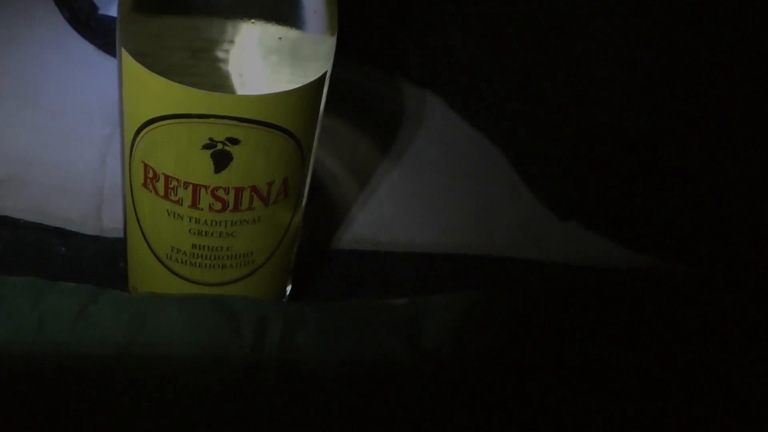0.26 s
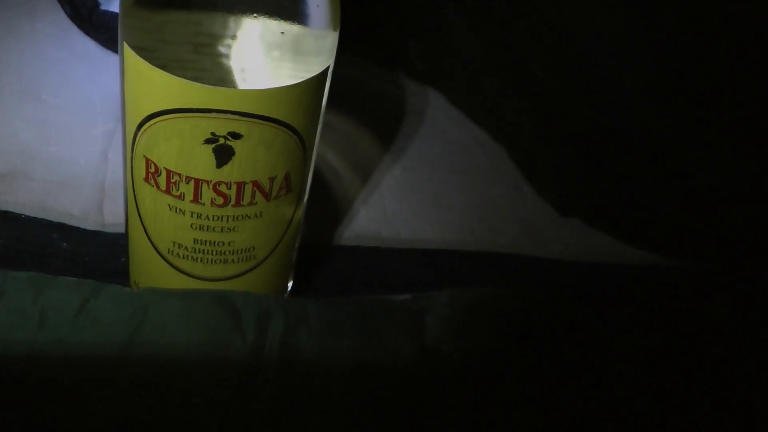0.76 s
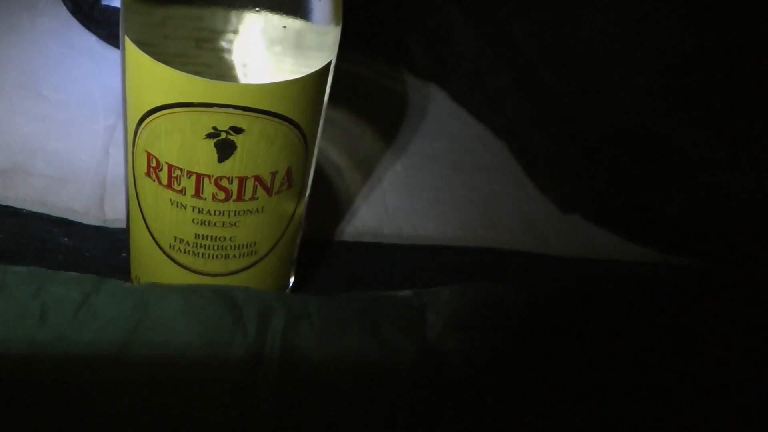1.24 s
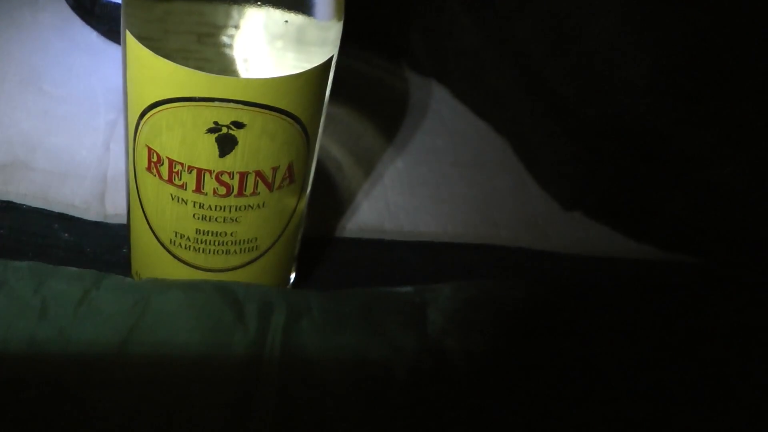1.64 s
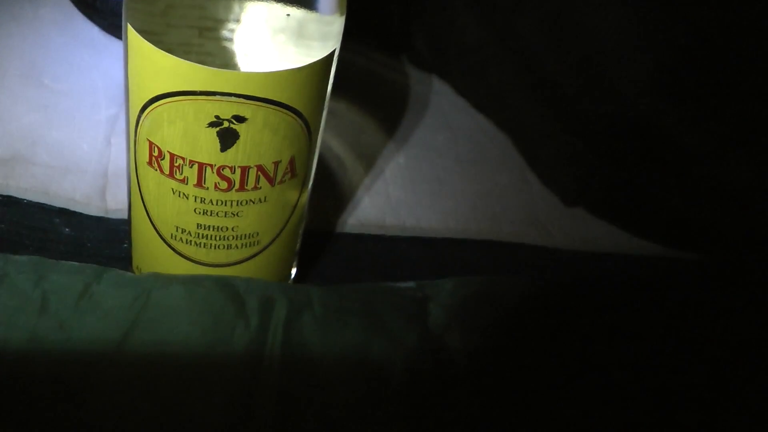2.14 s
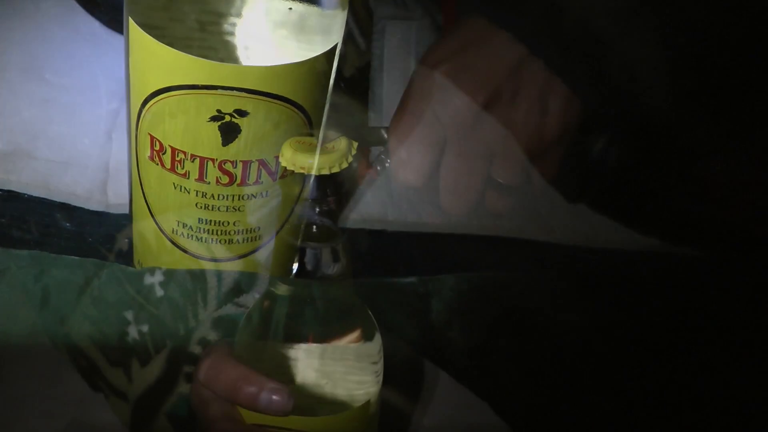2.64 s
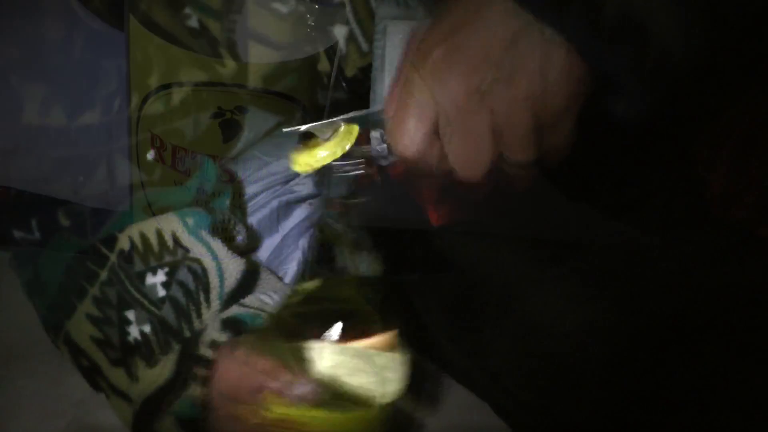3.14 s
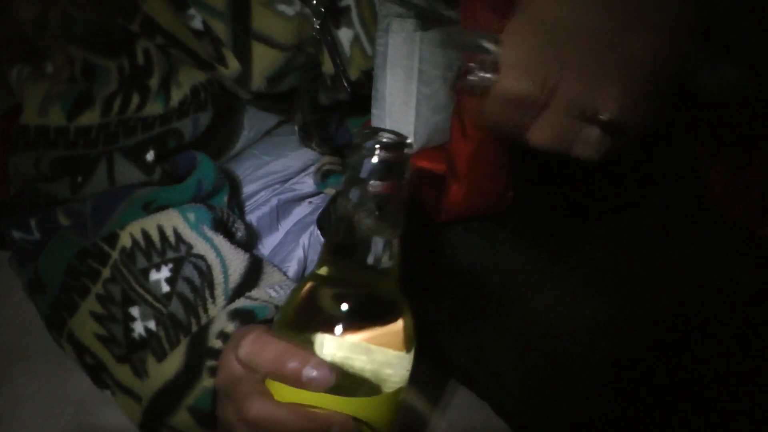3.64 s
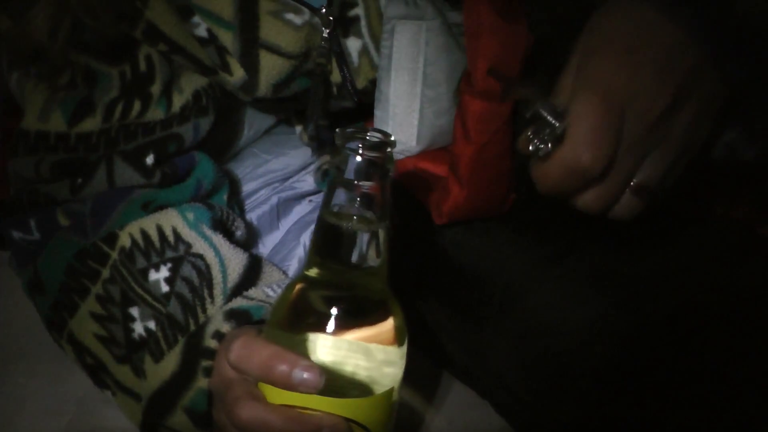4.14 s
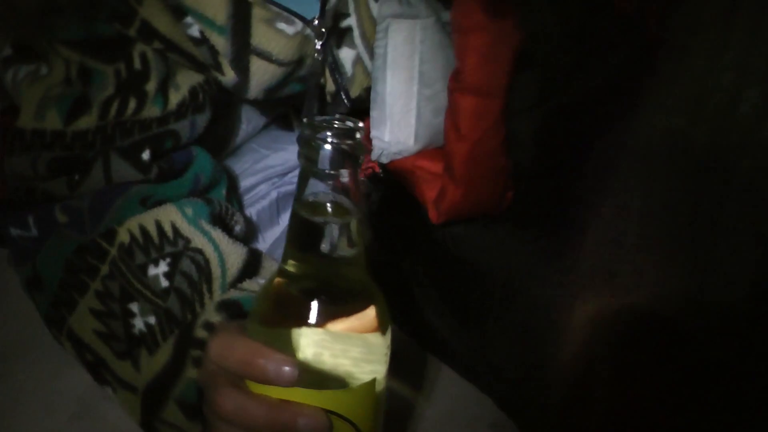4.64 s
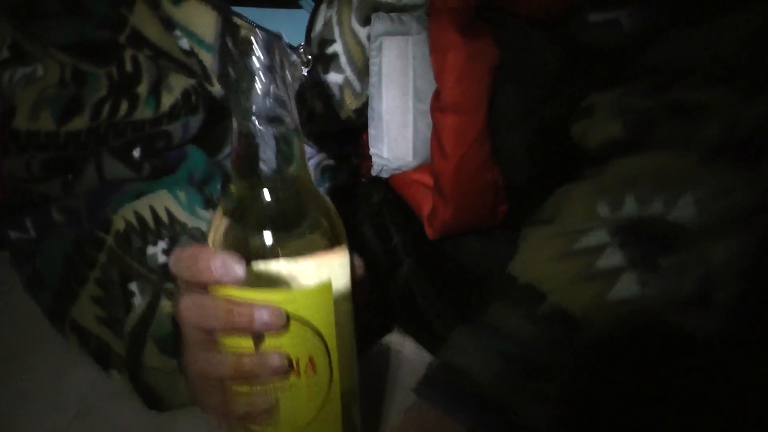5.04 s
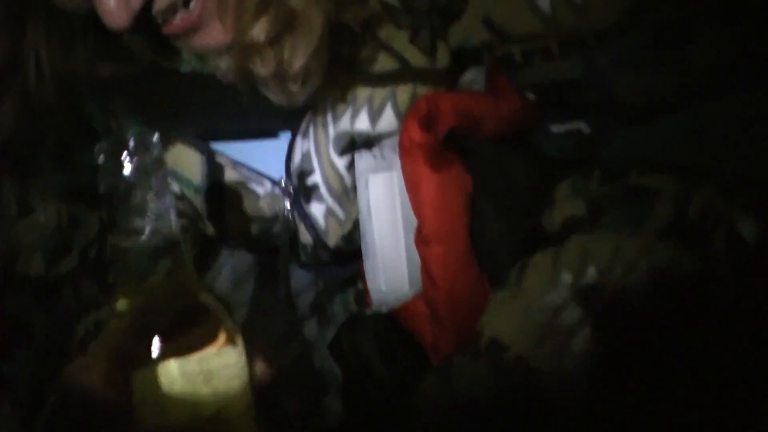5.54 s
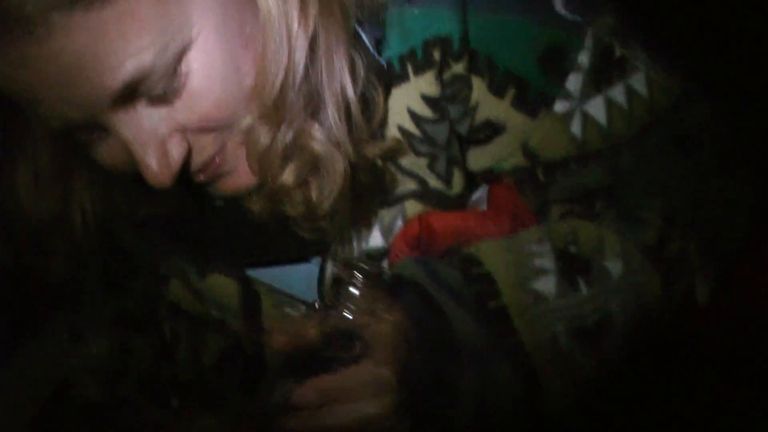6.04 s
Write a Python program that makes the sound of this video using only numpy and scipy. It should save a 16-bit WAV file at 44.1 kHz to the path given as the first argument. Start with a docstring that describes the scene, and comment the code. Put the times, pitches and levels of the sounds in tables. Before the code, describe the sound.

A night chorus of croaking frogs, with the pop and clink of a bottle being opened, then fabric rustles and handling knocks.

```python
"""Frogs call across the water at night: three croak in quick throat pulses that ring their vocal sacs,
a fourth pips, and more croak far off. Close by, someone levers the cap off a bottle: gas pops in the
neck, the steel opener rings and the cap clinks away. Then sleeves and a sleeping bag rustle, with
small knocks, as the bottle is moved."""
import sys
import numpy as np
from scipy import signal
from scipy.fft import rfft, irfft
from scipy.io import wavfile

SR = 44100
rng = np.random.default_rng(int(sys.argv[2]) if len(sys.argv) > 2 else 0)


def log_audio(samples):
    """Write samples as a 16-bit WAV file to the path given in sys.argv[1]."""
    # one column per channel
    frames = np.atleast_2d(samples).T
    # limit to full scale, then quantise
    limited = np.clip(frames, -1, 1)
    pcm = np.round(limited * 32767).astype(np.int16)
    wavfile.write(sys.argv[1], SR, pcm)


N = 276843
T = np.arange(N) / SR

# The near croaks and pips fade in together and grow louder: time_s, level_db
CALL_LEVEL = [(0, -63), (1, -55.5), (1.9, -51.5), (3, -50), (3.9, -47.5), (5.2, -45), (6.28, -48)]


def undb(db):
    """Turn decibels into a gain."""
    return 10 ** (np.asarray(db) / 20)


def unit(x):
    """Scale a sound to an average (rms) level of 1."""
    return x / np.sqrt(np.mean(x ** 2) + 1e-20)


def die_away(t, fade_s):
    """A fade that falls 60 dB in fade_s seconds."""
    return np.exp(-np.log(1000) * t / fade_s)


def curves(rows):
    """Turn each column after the times into a line through the whole scene."""
    times, *columns = np.transpose(rows)
    return [np.interp(T, times, column) for column in columns]


def add(out, start_s, x):
    """Mix a sound in at start_s."""
    i = int(round(start_s * SR))
    x = x[max(-i, 0):max(N - i, 0)]
    out[max(i, 0):max(i, 0) + len(x)] += x


def colour(x, spectrum):
    """Shape a sound's tone by (pitch_hz, level_db) points."""
    hz, db = np.transpose(spectrum)
    f = np.arange(N // 2 + 1) * SR / N + 1
    gain = undb(np.interp(np.log(f), np.log(hz), db))
    return unit(irfft(rfft(x) * gain, N))


def band(hz, width_hz, size):
    """Noise in one steep-sided band, with little bass."""
    f = np.arange(size // 2 + 1) * SR / size
    bass_cut = f ** 2 / (f ** 2 + (hz / 2) ** 2)
    gain = bass_cut / np.sqrt(1 + (2 * (f - hz) / width_hz) ** 4)
    return unit(irfft(rfft(rng.standard_normal(size)) * gain, size))


def wander(rate_hz):
    """A random line that drifts about 1 either side of zero."""
    points = rng.standard_normal(4096)
    return unit(np.interp(T * rate_hz, np.arange(len(points)), points))


def outdoors(x, echo_db, fade_s):
    """Reeds and banks scatter a short echo behind the sound."""
    t = T[:SR // 2]
    tail = rng.standard_normal(len(t)) * die_away(t, fade_s) * (t > .003)
    return x + undb(echo_db) * signal.fftconvolve(x, tail / np.linalg.norm(tail))[:N]


def bursts(bands, hits, rise_s):
    """Each hit is a sudden noise in the given bands that dies quickly."""
    out, t = np.zeros(N), T[:SR // 8]
    attack = 1 - np.exp(-t / rise_s)
    for start_s, db, fade_s in hits:
        noise = sum(undb(band_db) * band(hz, width, len(t)) for hz, width, band_db in bands)
        add(out, start_s, undb(db) * noise * attack * die_away(t, fade_s))
    return out


def ringing(tones, onsets):
    """At each onset the tones build up over rise_s, then ring away."""
    out, t = np.zeros(N), T[:SR // 3]
    ring = sum(undb(db) * np.sin(2 * np.pi * hz * t) * die_away(t, fade_s) for hz, db, fade_s in tones)
    for start_s, db, rise_s in onsets:
        add(out, start_s, undb(db) * ring * np.minimum(t / rise_s, 1))
    return out


def croak(length_s, sacs, pulses, speedup, glide, swell, rasp_db):
    """Throat pulses speed up, swell and fade; the tightening vocal sacs ring higher as they go."""
    progress = np.linspace(0, 1, pulses)
    starts = length_s * (progress + speedup * progress * (1 - progress))
    starts += .0001 * rng.standard_normal(pulses)
    arch = np.sin(np.pi * (np.arange(1, pulses + 1) / (pulses + 1)) ** swell)  # more swell peaks later
    sizes = arch * undb(rng.standard_normal(pulses))
    tension = (1 + glide * (progress - .6) + .009 * rng.standard_normal(pulses))[:, None]
    age = T[:SR // 40]
    rings = 0
    for hz, width, db in sacs:
        fade = 2 * np.pi * width * age
        envelope = width * fade ** 2 * np.exp(-fade)  # builds up and dies smoothly
        rings = rings + undb(db) * envelope * np.sin(2 * np.pi * hz * tension * age)
    voice, airflow = np.zeros((2, SR // 8))
    for start_s, size, ring in zip(starts, sizes, rings):
        add(voice, start_s, size * ring)
        add(airflow, start_s, size * np.exp(-age / .003))
    rasp = unit(airflow * band(2700, 4100, len(airflow)))  # air scrapes through with every pulse
    return (unit(voice) + undb(rasp_db) * rasp) * np.sqrt(length_s * SR / len(voice))


def frog(runs, sacs, length_s, gain_db, drift_per_s, **shape):
    """One frog croaks in evenly spaced runs while its pitch slowly drifts."""
    out = np.zeros(N)
    for first_s, period_s, croaks, run_db in runs:
        for start_s in first_s + period_s * np.arange(round(croaks)):
            call_db = np.interp(start_s, *np.transpose(CALL_LEVEL))
            db = call_db + gain_db + run_db + .8 * rng.standard_normal()
            tuning = 1 + drift_per_s * (start_s - 2)
            tuned_sacs = [(hz * tuning, width, sac_db) for hz, width, sac_db in sacs]
            add(out, start_s, undb(db) * croak(length_s, tuned_sacs, **shape))
    return out


def near_frogs():
    """The nearest frog, its neighbour and a raspy third each have their own throat and rhythm."""
    # Runs of croaks: start_s, period_s, croak_count, boost_db
    lead_runs = [(-.018, .202, 2, 0), (.427, .2157, 9, .3), (2.323, .197, 2, .5), (2.733, .2142, 3, 0),
                 (3.392, .2125, 9, 1), (5.27, .146, 2, 1), (5.615, .223, 3, .5)]
    neighbour_runs = [(.097, .224, 4, 0), (.986, .2128, 7, 0)]
    raspy_runs = [(.076, .1684, 9, 0), (1.614, .186, 2, .5), (1.996, .213, 7, .5), (3.487, .213, 8, -1.5),
                  (5.145, .18, 2, 6), (5.505, .207, 4, 0)]
    # Where throat and vocal sacs ring: pitch_hz, width_hz, level_db
    lead_sacs = [(826, 72, -5.5), (1030, 108, -7), (1196, 82, -10), (2049, 177, 1.9), (2940, 450, -20)]
    neighbour_sacs = [(876, 50, -15.5), (1060, 67, -14), (2045, 180, -5), (2900, 330, -21.5)]
    raspy_sacs = [(927, 99, -4.5), (1130, 103, -4), (2074, 276, -2), (2387, 143, 2.5), (3340, 300, -12)]
    lead = frog(lead_runs, lead_sacs, length_s=.063, gain_db=.75, drift_per_s=.0056,
                pulses=9, speedup=.12, glide=.0637, swell=.93, rasp_db=-22.5)
    neighbour = frog(neighbour_runs, neighbour_sacs, length_s=.052, gain_db=1.5, drift_per_s=.0043,
                     pulses=8, speedup=.22, glide=.08, swell=1.56, rasp_db=-22.5)
    raspy = frog(raspy_runs, raspy_sacs, length_s=.06, gain_db=-.97, drift_per_s=-.0079,
                 pulses=9, speedup=.33, glide=.093, swell=1.16, rasp_db=-13)
    return lead + neighbour + raspy


def pipping_frog(gain_db, base_hz, arch, sharpness):
    """A fast trill of short arched whistles that tilt down at first and later up."""
    # The frog slowly tires, then steadies: time_s, pips_per_s
    pip_rate = [(0, 27.9), (2.4, 24.85), (2.85, 22.2), (3.4, 24.8), (6.28, 24.2)]
    phase = np.cumsum(curves(pip_rate)[0]) / SR % 1 - .5  # zero in the middle of each pip
    tilt = np.interp(T, [2.5, 3.5], [-.11, .27])
    sag = .027 * np.clip(T - 2.5, 0, 1)
    pitch_hz = base_hz * (1 + tilt * phase - arch * phase ** 2 + .0221 * wander(40) - sag)
    envelope = np.abs(np.cos(np.pi * phase)) ** sharpness
    pips = unit(envelope * np.sin(2 * np.pi * np.cumsum(pitch_hz) / SR))
    return pips * undb(curves(CALL_LEVEL)[0] + gain_db + 1.2 * wander(8.4))


def far_frogs(count):
    """Distant frogs, each with its own pitch and tempo, blur into their echoes."""
    # Their loudness together: time_s, level_db
    loudness = [(0, -72), (.5, -66.5), (1.2, -64), (2.4, -63.5), (3, -55), (4, -55.5), (5, -53.5),
                (6.28, -54.5)]
    # Where a typical frog's sacs ring: pitch_hz, width_hz, level_db
    typical_sacs = [(791.1, 30, 0), (1106, 107, -7), (2230, 283, -1), (2750, 460, -7.5)]
    # The shape of each croak: speedup, glide, swell, rasp_db
    shape = (.12, .06, 1.2, -20)
    out = np.zeros(N)
    for tuning, period_s, first_s in rng.uniform([.94, .16, -.2], [1.06, .26, 0], (count, 3)):
        sacs = [(hz * tuning, width, db) for hz, width, db in typical_sacs]
        for beat_s in np.arange(first_s, T[-1], period_s):
            add(out, beat_s + .008 * rng.standard_normal(), croak(.062 / tuning, sacs, 8, *shape))
    return unit(outdoors(out, echo_db=0, fade_s=.41)) * undb(curves(loudness)[0])


def night_air():
    """Still air gives a faint wavering hush, plus a steady one that spreads it between the ears."""
    # Tone of the hush: pitch_hz, level_db
    tone = [(25, -34), (60, 2.5), (130, 4.5), (330, 0.5), (520, -6.5), (1500, 1.5), (4000, -5),
            (7000, -12.5), (8500, -20), (14500, -21), (16500, -37.5)]
    # Its loudness: time_s, level_db
    loudness = [(0, -73), (.3, -69), (1, -68.5), (1.5, -68), (2.1, -65), (2.6, -69), (6.28, -74)]
    hush = colour(rng.standard_normal(N), tone) * undb(curves(loudness)[0] + .71 * wander(6))
    spread = undb(-74.5) * colour(rng.standard_normal(N), tone)
    return hush, spread


def opening_ring():
    """A faint, high tone rings briefly at the very start."""
    # The ring: pitch_hz, level_db, fade_s
    tones = [(4010, -2.5, 0.15)]
    # Its onset: start_s, level_db, rise_s
    onsets = [(.003, -56, 0.0017)]
    return ringing(tones, onsets)


def brushes(grain_db):
    """Cloth and skin brush past in short, grainy strokes that swell and fade."""
    # Strokes: start_s, length_s, level_db, pitch_hz, width_hz
    strokes = [(0.248, 0.09, -66.5, 529, 160), (3.55, 0.037, -56, 303, 296), (3.74, 0.016, -34, 760, 700),
               (3.742, .13, -42, 5450, 3000), (3.764, 0.066, -53.5, 188, 199), (3.784, .12, -45, 807, 167),
               (3.985, 0.07, -45.5, 2480, 1170), (4.615, 0.52, -55, 450, 70),
               (4.873, 0.12, -42.5, 1160, 2000), (4.969, 0.15, -41, 808.6, 1310),
               (5.269, .24, -52, 300, 450), (5.072, 0.057, -33.5, 1380, 2440),
               (5.836, 0.157, -48, 4960, 900)]
    out, t = np.zeros(N), T[:SR // 2]
    for start_s, length_s, db, hz, width in strokes:
        swell = np.sin(np.pi * np.minimum(t / length_s, 1))
        add(out, start_s, undb(db) * band(hz, width, len(t)) * swell)
    return out * undb(grain_db * wander(400))


def creases():
    """Creases in the cloth snap with bright ticks."""
    # Tone of a snap: pitch_hz, width_hz, level_db
    bands = [(7000, 8500, 0)]
    # Snaps: start_s, level_db, fade_s
    snaps = [(1.152, -54.5, 0.014), (1.79, -50, 0.007), (1.839, -56.5, 0.0095), (1.885, -51, 0.0085),
             (5.2393, -24, 0.0056), (5.4026, -22, 0.017), (5.458, -26, 0.016), (5.472, -31, 0.0216)]
    return bursts(bands, snaps, rise_s=.0011)


def cloth_rustle(grain_db, flutter_db):
    """Fibres catch and slip while folds flutter; each layer follows the loudness at its own rate."""
    # Loudness of the rustle, dropping out briefly after the clink: time_s, relative_level_db
    loudness = [(2.3, -29), (2.55, -25), (3.19, -16.5), (3.33, -10), (3.4, -24), (3.58, -5.5),
                (3.67, -12.5), (3.76, -1), (3.92, -11.5), (4.3, -9.5), (4.55, -5), (4.82, -7.5), (5.1, 0),
                (5.28, -3), (5.6, -3.5), (6.28, -2.5)]
    # Tones of the sliding hiss, the low folds and the crisp top: pitch_hz, level_db
    hiss_tone = [(700, -26), (1400, -2.5), (1600, 0.5), (2400, 6), (3300, 0.5), (4200, -1), (5300, 2.5),
                 (7000, -4), (9500, -11), (12000, -32), (16000, -41)]
    fold_tone = [(25, -43.5), (70, -18), (130, -9), (220, -8.5), (380, -2.5), (500, 0.5), (750, 0.5),
                 (1100, -6.5), (1600, -2.5), (3000, -27)]
    crisp_tone = [(5000, -25), (8000, 9.5), (10500, 6), (14500, 0.5), (16500, -22)]
    rustle_db = curves(loudness)[0]
    friction = [rng.standard_normal(N) * undb(grain_db * wander(600) + flutter_db * wander(45))
                for _ in range(3)]
    hiss = colour(friction[0], hiss_tone) * undb(-41 + rustle_db)
    folds = colour(friction[1], fold_tone) * undb(-50.5 + .68 * rustle_db)
    crisp = colour(friction[2], crisp_tone) * undb(-56 + 1.025 * rustle_db)
    fade_in = np.interp(T, [2.35, 2.7], [0, 1])
    return (hiss + folds + crisp) * fade_in


def bottle_pop(gain_db, roughness):
    """The seal cracks, and gas spits out and rings the neck in a quick upward chirp."""
    # The neck's note: time_s, pitch_hz, relative_level_db
    neck = [(3.2025, 757, -42), (3.2035, 798, -29), (3.208, 1030, -12), (3.215, 1253, -15.5),
            (3.224, 1395, -19), (3.233, 1423, -21), (3.243, 1460, -36)]
    # Tones of the seal and the gas: pitch_hz, width_hz, level_db
    seal_bands = [(2845, 4200, -2.5), (930, 480, -6), (300, 117, -17), (12900, 7000, -20)]
    gas_bands = [(8800, 5260, 1), (4000, 4000, -6.5), (13000, 6000, -23)]
    # The seal's crack and the spits of gas: start_s, level_db, fade_s
    crack = [(3.2028, -13.5, 0.039)]
    spits = [(3.211, -17.5, 0.045), (3.219, -30, 0.066), (3.24, -28, 0.068)]
    hz, db = curves(neck)
    sounding = (T > neck[0][0]) & (T < neck[-1][0])
    chirp = sounding * undb(db + gain_db) * np.sin(2 * np.pi * np.cumsum(hz) / SR)
    chirp *= 1 + roughness * wander(510)
    return chirp + bursts(seal_bands, crack, rise_s=.00042) + bursts(gas_bands, spits, rise_s=.0004)


def hand_jolts():
    """The hand jolts with dull, low thuds."""
    # Jolts: start_s, level_db, pitch_hz, fade_s
    jolts = [(3.206, -34, 107, 0.14), (3.356, -37, 35.6, 0.072), (5.4, -48.5, 111, 0.18)]
    out, t = np.zeros(N), T[:SR // 4]
    for start_s, db, hz, fade_s in jolts:
        add(out, start_s, undb(db) * np.sin(2 * np.pi * hz * t) * die_away(t, fade_s))
    return out


def opener_and_cap():
    """Steel snaps over steel, and both opener and cap ring as they are struck."""
    # Tone of a slip: pitch_hz, width_hz, level_db
    slip_bands = [(4730, 1100, -1.5), (9500, 11998, -7.5), (295, 1230, -20.5)]
    # Slips: start_s, level_db, fade_s
    slips = [(3.232, -29, 0.1), (3.356, -25, .005), (3.3555, -4, 0.011)]
    # How each part rings: pitch_hz, level_db, fade_s
    opener_tones = [(1091, -19, .2), (2229, -22, .15), (2400, -17, .05), (4054, -20, .08), (4402, 0, .095),
                    (4677, -10, .095), (6448, -10, .1), (7386, -24, .06), (9040, -19, .11),
                    (10090, -30, .11), (10828, -11, .045), (11940, -31, .12), (12610, -28, .1),
                    (13090, -20, .045), (14030, -24, .085), (15460, -30, .085)]
    cap_tones = [(2270, -26, 0.042), (3940, -25, 0.046), (4900, -32, 0.022), (5180, -0.5, 0.035),
                 (5570, -24, 0.067), (7270, 4.5, 0.0037), (8610, -8, 0.026), (9943, -31, .023),
                 (10860, -35, 0.035), (12650, -28, .055), (14050, -34, .06), (15300, -27.5, 0.0098)]
    # Blows on each part (a scraping one rises slowly): start_s, level_db, rise_s
    opener_blows = [(3.2215, -23, 0.0012), (3.2298, -10, 0.0016), (3.559, -39.5, 0.005)]
    cap_blows = [(3.2305, -14, 0.0023), (3.241, -17, 0.0022), (3.3551, -4, 0.00096), (3.482, -24, 0.018)]
    snaps = bursts(slip_bands, slips, rise_s=.00026)
    return snaps + ringing(opener_tones, opener_blows) + ringing(cap_tones, cap_blows)


def bedding_bumps():
    """Soft bedding turns bumps into short, dull thumps."""
    # Tone of a bump: pitch_hz, width_hz, level_db
    bands = [(347, 183, 0)]
    # Bumps: start_s, level_db, fade_s
    bumps = [(3.6025, -39.5, .034), (4.114, -33.5, 0.028), (4.5, -42.5, 0.043), (4.594, -43.5, 0.074),
             (5.399, -28.5, 0.037), (5.478, -34.5, 0.0328)]
    return bursts(bands, bumps, rise_s=.0008)


def bottle_knocks():
    """Bottle and opener knock in the hand, too damped to ring on."""
    # Tone of a knock: pitch_hz, width_hz, level_db
    bands = [(2450, 897.5, -2.5), (3070, 4502, -5), (1020, 1100, -8.5)]
    # Knocks: start_s, level_db, fade_s
    knocks = [(3.603, -11.5, 0.007), (3.706, -18, .009), (4.003, -32, 0.023), (4.881, -28, 0.015),
              (5.097, -20.5, 0.017), (5.156, -24.5, 0.021), (5.264, -17, 0.0068), (5.359, -19, 0.02),
              (5.397, -19, 0.032), (5.4707, -23.5, 0.031), (5.726, -24.5, 0.012)]
    return bursts(bands, knocks, rise_s=.001)


def scene():
    """Frogs over the water and the bottle close by, all louder on the left."""
    frogs = near_frogs() + pipping_frog(gain_db=-11.5, base_hz=1215, arch=1.1, sharpness=3.2)
    bottle = bottle_pop(gain_db=-6, roughness=.52) + hand_jolts() + opener_and_cap()
    handling = cloth_rustle(grain_db=.8, flutter_db=2) + brushes(grain_db=2)
    handling += bottle_knocks() + bedding_bumps() + creases()
    hush, spread = night_air()
    mix = outdoors(frogs, echo_db=-12, fade_s=.15) + far_frogs(count=4)
    mix += outdoors(opening_ring() + bottle, echo_db=-30, fade_s=.073) + handling + hush
    left_gain = 2 / (1 + undb(-7))  # 7 dB above the right
    return np.array([left_gain * mix + spread, (2 - left_gain) * mix - spread])


def record(dry):
    """The microphone weakens a few bands, rounds off the loudest peaks and cuts the highest treble."""
    # Weakened bands: pitch_hz, width_hz, level_db
    dips = [(494, 100, -9), (1561, 136, -37), (8380, 1270, -2.5)]
    for hz, width, db in dips:
        in_band = signal.lfilter(*signal.iirpeak(hz, hz / width, fs=SR), dry)
        dry = dry - (1 - undb(db)) * in_band
    ceiling, top_hz = .7, 16500
    rounded = dry / (1 + (dry / ceiling) ** 6) ** (1 / 6)
    return signal.sosfilt(signal.ellip(8, .2, 70, top_hz, fs=SR, output="sos"), rounded)


dry = scene()
out = record(dry)
log_audio(out)
```